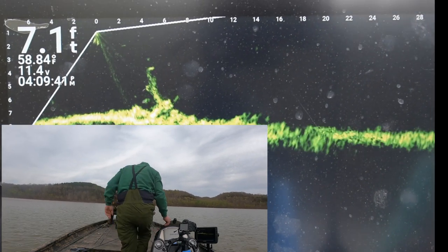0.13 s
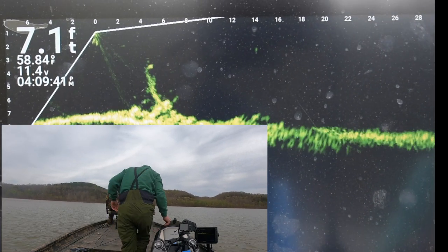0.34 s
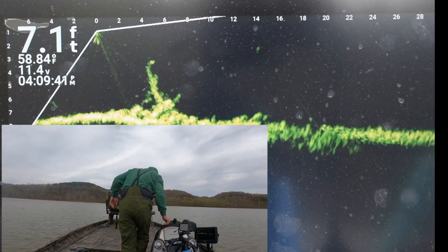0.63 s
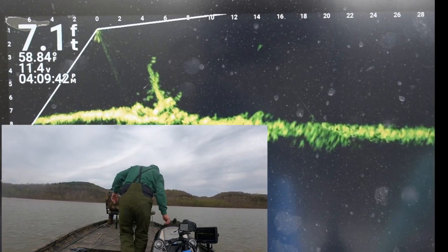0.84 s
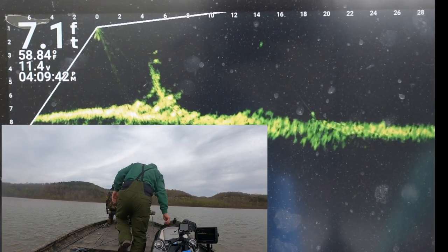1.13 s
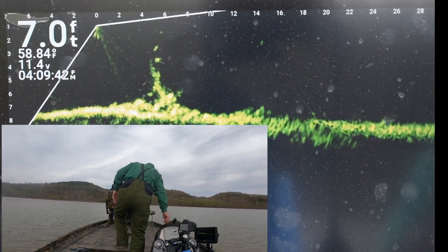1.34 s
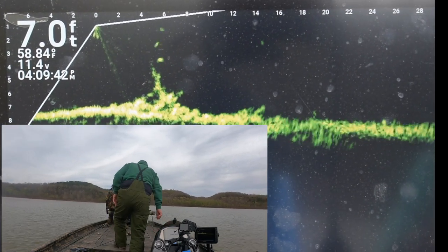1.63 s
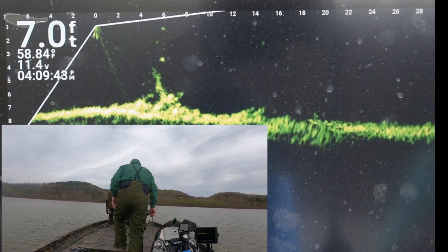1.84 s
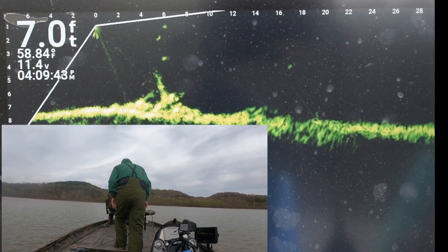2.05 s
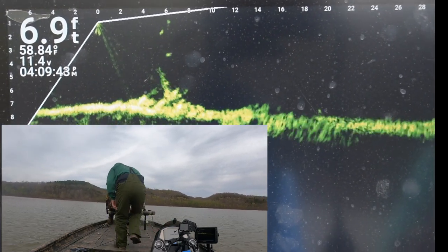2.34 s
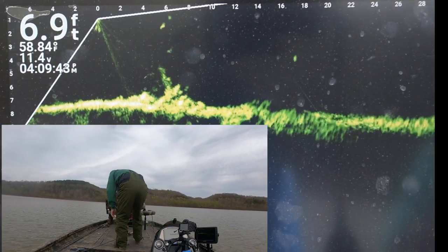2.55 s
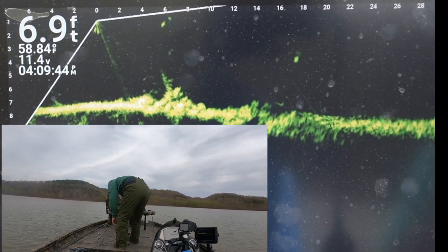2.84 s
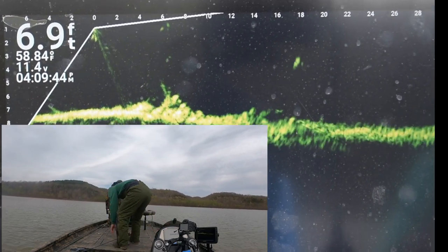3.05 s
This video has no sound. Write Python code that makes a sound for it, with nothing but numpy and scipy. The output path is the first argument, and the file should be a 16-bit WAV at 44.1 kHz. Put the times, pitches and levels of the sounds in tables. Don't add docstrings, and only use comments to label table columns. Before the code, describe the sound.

Heavy footsteps knock on a hollow boat deck as rain gear rustles and wind rumbles at the microphone.

```python
import sys
import numpy as np
from scipy import signal
from scipy.fft import rfft, irfft
from scipy.io import wavfile
from scipy.ndimage import uniform_filter1d

SR = 44100
rng = np.random.default_rng(int(sys.argv[2]) if len(sys.argv) > 2 else 0)


def wav_record(signal):
    frames = np.transpose(np.atleast_2d(signal))
    bounded = np.clip(frames, -1, 1)
    quanta = np.round(bounded * 32767).astype(np.int16)
    wavfile.write(sys.argv[1], SR, quanta)


def invert_db(level):
    return 10 ** (np.asarray(level, dtype=float) / 20)


N = 141120
BURST = SR // 2

# [f/Hz, level/dB]
AIR_SPECTRUM = [(150, -0.5), (300, -8.5), (800, -24), (1300, -28.5), (2200, -33), (6200, -30), (12000, -53),
                (15500, -76)]
# [t/s, level/dB, level above 80 Hz/dB]
GUSTS = [(.05, -38, -11.5), (.32, -30.5, 5.5), (.55, -27.5, -9.5), (.66, -40.5, -0.5), (.76, -35.5, -7),
         (1.0, -33, -7), (1.2, -46.5, 3), (1.4, -37.5, -8), (1.65, -53, 11.5), (1.9, -37.5, 1),
         (2.12, -45.5, 6.5), (2.3, -30.5, -1), (2.46, -42, -0.5), (2.52, -24, -9.5), (2.74, -34.5, 10.5),
         (2.83, -47, 7.5), (2.95, -34, 0.5), (3.2, -40, -0.5)]
# [f/Hz, level/dB]
WIND_SPECTRUM = [(12, -3.5), (30, 7), (60, 0), (110, -7.5), (200, -20.5), (400, -45.5), (800, -49.5)]
THUMP_TIMES = [.326, .332, .422, .459, .466, .752, 1.085, 1.762, 1.95, 2.025, 2.03, 2.571, 2.681, 2.841,
               2.845, 2.842, .934, 2.505, 1.767, .713]
# [f/Hz, peak level/dB, t60/s, left over right/dB]
THUMP_MODES = [(58.8, -29, 0.76, 0), (113.3, -29.5, 0.19, -12), (144, -17.5, 0.089, -1),
               (38.1, -17.5, 0.37, -6.5), (90, -17, 0.075, -13), (136, -32, 0.086, -2),
               (251, -41.5, 0.14, -1), (176, -17, 0.043, -0.5), (86, -37, 0.29, 2), (355, -41, 0.026, -3),
               (58.4, -33, 0.16, -5), (45.6, -19, 0.25, -12), (65.4, -19.5, 0.26, -11.5),
               (58.9, -16.5, 0.4, 0), (128, -13.5, 0.08, -1), (322, -25, 0.024, 0), (233.4, -27, 0.079, 1),
               (45, -32, 0.13, -6), (202, -29, 0.13, 1), (460, -29.5, 0.047, 1.5)]
# [t/s, peak level/dB, f/Hz, rub length/s]
TACKLE_RUBS = [(0.278, -43.5, 2840, 0.026), (0.676, -35.5, 456, 0.061), (.711, -36.5, 415, 0.0097),
               (0.713, -36.5, 990, 0.0045), (0.772, -38, 1820, 0.016), (.79, -41, 473, 0.055),
               (0.858, -38, 620, 0.031), (0.914, -30.5, 4120, 0.011), (0.908, -36.5, 1770, 0.013),
               (1.05, -40.5, 1700, 0.024), (1.075, -34.5, 724, 0.0095), (1.163, -49, 1300, 0.047),
               (1.216, -39.5, 1570, 0.019), (1.245, -44, 1440, 0.011), (1.339, -36.5, 1223, 0.029),
               (1.384, -43.5, 1190, 0.014), (1.739, -35, 690, 0.015), (1.798, -41.5, 1910, 0.015),
               (2.08, -42, 1240, 0.0055), (2.158, -37.5, 1090, 0.039), (2.248, -36.5, 664, 0.0076),
               (2.27, -39, 1300, 0.013), (2.46, -38, 414, 0.048), (2.647, -44, 1800, 0.018),
               (2.68, -46, 616, 0.008), (2.695, -34.5, 4380, 0.011), (2.952, -48.5, 6100, 0.014),
               (3.003, -49, 1550, 0.0059), (3.095, -45.5, 638, .01), (3.113, -41, 2180, 0.023)]
# [t/s, peak level/dB]
TACKLE_TICKS = [(0.229, -52), (.755, -44.5), (.787, -41), (0.96, -42), (1.054, -37.5), (1.076, -47.5),
                (1.244, -55), (1.385, -48.5), (2.247, -38), (2.849, -22.5), (3.098, -45)]
# [t/s, peak level/dB, f/Hz, rub length/s]
MORE_TACKLE_RUBS = [(.414, -58, 1000, .008), (.436, -34, 1300, .012), (.482, -36, 3900, .008),
                    (.488, -37, 1100, .012), (.652, -55, 3000, .02), (.74, -40.5, 500, .02),
                    (.76, -46, 3000, .008), (.805, -43.5, 800, .025), (.858, -42, 1020, .01),
                    (.865, -47, 2300, .035), (.89, -48, 3600, .006), (.93, -41, 800, .006),
                    (.962, -43, 500, .012), (.98, -48, 3800, .01), (1.188, -44, 1400, .01),
                    (1.2, -45.5, 900, .015), (1.216, -47.5, 2900, .012), (1.298, -56, 1300, .004),
                    (1.315, -50, 2200, .012), (1.34, -52, 2600, .015), (1.772, -51, 1200, .03),
                    (1.8, -58, 5100, .015), (1.815, -55, 3300, .012), (1.942, -34.5, 4000, .01),
                    (2.225, -42, 1480, .015), (2.33, -47, 600, .04), (2.47, -40, 280, .03),
                    (2.697, -43.5, 1450, .015), (2.748, -63, 1770, .015), (2.75, -55, 5400, .015),
                    (2.797, -59, 6500, .01), (2.86, -32, 420, .03), (3.1, -45.5, 350, .02)]
# [t/s, peak level/dB, t60/s]
MORE_TACKLE_TICKS = [(1.759, -40, 0.072), (1.939, -30, 0.016), (.418, -35.5, 0.034), (0.71, -38, .03),
                     (2.842, -40, 0.037), (2.248, -44, 0.026)]
# [f/Hz, level/dB]
TICK_SPECTRUM = [(1200, -5), (2500, 2.5), (4500, 2), (7500, -2.5), (10000, -19.5), (15000, -35)]
# [t/s, fabric level/dB, carpet level/dB]
CLOTH_MOVES = [(0, -50.5, -62.5), (.12, -46.5, -57), (.2, -54, -59.5), (0.231, -54, -77), (.25, -73, -60.5),
               (.56, -71.5, -74), (.63, -67.5, -74), (.68, -62.5, -55.5), (.8, -56, -55), (.92, -48, -46),
               (1.0, -55, -60.5), (1.09, -57, -53.5), (1.12, -67.5, -56.5), (1.3, -64, -57),
               (1.5, -66, -63.5), (1.68, -91, -73.5), (1.78, -69.5, -61), (1.85, -67, -62),
               (2.1, -64.5, -62), (2.2, -59, -53.5), (2.24, -51, -46.5), (2.32, -51.5, -48.5),
               (2.4, -61, -54.5), (2.46, -50.5, -54), (2.57, -52, -55.5), (2.61, -68, -58),
               (2.716, -58, -56.5),
               (2.78, -88, -66),
    (3.04, -71, -63.5),
    (3.2, -63.5, -58.5),
]
# [f/Hz, level/dB]
FABRIC_SPECTRUM = [(1200, -12), (2200, -0.5), (4000, 1), (5500, -0.5), (7500, -4.5), (10000, -14),
                   (12400, -15), (15500, -33)]
# [f/Hz, level/dB]
CARPET_SPECTRUM = [(250, 0), (420, -6), (700, -7), (1400, -8.5), (3000, -20.5)]
FOLD_BANDS = [2600, 5220, 3800, 7500]
# [t/s, panel level/dB, knock level/dB, crack level/dB, rise/s]
BLOWS = [
    (.411, -25, -28, -32, 0.009),
    (.479, -25.5, -29.5, -30.5, 0.0018),
    (0.927, -29, -25.5, -30.5, 0.0029),
    (1.757, -23, -23, -42.5, 0.0063),
    (1.937, -23, -26.5, -26.5, 0.0013),
    (2.841, -18.5, -23, -31.5, 0.0039),
]
CRACK_T60 = [0.18, 0.089, 0.13, 0.12, 0.052, 0.25]
# [f/Hz, level/dB]
PANEL_MODES = [(155, -2), (210, 1), (240, -1.5), (290, -6), (380, -15)]
# [f/Hz, level/dB]
KNOCK_MODES = [(480, 6), (590, 3), (678, 5), (900, -0.5), (1100, 0.5), (1300, -1.5), (1630, -4),
               (2000, -16.5)]
# [f/Hz, level/dB]
CRACK_SPECTRUM = [(1400, 5.5), (2500, 5), (3100, 1.5), (3800, 3.5), (6000, -10.5), (8000, -12),
                  (11000, -27.5), (15000, -40)]
# [f/Hz, side below mid/dB]
DIFFUSE_SIDE = [(300, -23), (2000, -12), (3500, -34), (8500, -29), (11000, -9), (15000, -1.5)]
# [f/Hz, side below mid/dB]
IMPACT_SIDE = [(200, -19.5), (1300, -16), (2400, -10), (6000, -16), (15000, -1)]


def level(x, db):
    return x * invert_db(db) / np.sqrt(np.mean(x ** 2))


def shape(x, points):
    p = np.array(points, float)
    f = np.fft.rfftfreq(len(x), 1 / SR) + 1
    db = np.interp(np.log(f), np.log(p[:, 0]), p[:, 1])
    db -= 18 * np.maximum(np.log2(p[0, 0] / f), 0)
    db -= 24 * np.maximum(np.log2(f / p[-1, 0]), 0)
    return irfft(rfft(x) * invert_db(db), len(x))


def colour(x, points):
    return level(shape(x, points), 0)


def lowpass(x, hz):
    return signal.sosfiltfilt(signal.butter(2, hz, fs=SR, output="sos"), x)


def walk(rate):
    k = int(SR / rate)
    held = np.repeat(rng.standard_normal(N // k + 1), k)
    return 0.98 * uniform_filter1d(uniform_filter1d(held, k), k)[:N]


def fade(t60):
    return 1000. ** (-np.arange(BURST) / SR / max(t60, .002))


def ring(x, hz, t60):
    pole = np.exp(2j * np.pi * hz / SR - np.log(1000) / (max(t60, .002) * SR))
    return signal.lfilter([1], [1, -pole], x).imag


def add(out, t, x, db):
    i = int(t * SR)
    x = x[:N - i]
    out[i:i + len(x)] += x * invert_db(db) / np.abs(x).max()


def scattered(x, lag):
    smear = rng.standard_normal(SR // 8) * np.exp(-np.arange(SR // 8) / SR / lag)
    return signal.fftconvolve(x, smear / np.linalg.norm(smear))[:N]


def open_water(t):
    air = colour(rng.standard_normal(N), AIR_SPECTRUM) * invert_db(-60 + 1.8 * walk(7.05))
    duck = sum((t > blow[0]) * np.exp(-np.abs(t - blow[0]) / 0.078) for blow in BLOWS)
    return air * invert_db(-1 * duck)


def motor():
    hz = 136.8 * (1 + 0.012 * walk(2.7))
    tone = np.sin(2 * np.pi * np.cumsum(hz) / SR)
    return level(tone, -59) * invert_db(2 * walk(4.6))


def port_turbulence(t):
    gust_t, gust_db, eddy_db = np.array(GUSTS).T
    x = colour(rng.standard_normal(N), WIND_SPECTRUM)
    low = lowpass(x, 80)
    eddies = (x - low) * invert_db(np.interp(t, gust_t, eddy_db) + 6 * walk(18))
    return (low + eddies) * invert_db(np.interp(t, gust_t, gust_db) + walk(9.98))


def wind(t):
    both = port_turbulence(t)
    left = both + invert_db(-6.5) * port_turbulence(t)
    right = both + invert_db(-4.5) * port_turbulence(t)
    return np.array([left, right]) * invert_db(-0.5)


def thumps():
    out = np.zeros((2, N))
    for t, (hz, db, t60, pan_db) in zip(THUMP_TIMES, THUMP_MODES):
        half_period = int(SR / hz / 2)
        push = np.zeros(BURST)
        push[:half_period] = np.hanning(half_period)
        thump = ring(push, hz, t60)
        add(out[0], t, thump, db + pan_db / 2)
        add(out[1], t, thump, db - pan_db / 2)
    return out


def rub(length):
    t = np.arange(BURST) / SR
    onset = 1 - np.exp(-t / (0.093 * length + 0.00045))
    return rng.standard_normal(BURST) * onset * np.exp(-(t / max(length, .001)) ** 2)


def tackle(rubs, ticks):
    out = np.zeros(N)
    for t, db, hz, length in rubs:
        push = rub(length)
        narrow_t60 = 1.63 * 5.3 / min(hz, np.sqrt(hz * 1500))
        narrow = ring(ring(push, hz, narrow_t60), hz, narrow_t60)
        wide = ring(ring(push, hz * 0.84, 4 / hz), hz * 0.84, 4 / hz)
        add(out, t, level(narrow, 0) + level(wide, -6.5), db)
    rise = np.minimum(np.arange(BURST) / SR / 0.0013, 1)
    for t, db, t60 in ticks:
        add(out, t, colour(rng.standard_normal(BURST), TICK_SPECTRUM) * fade(t60) * rise, db)
    return out


def grit():
    strength = invert_db(np.minimum(4 * rng.exponential(size=N), 12))
    grains = (rng.random(N) < 600 / SR) * strength * rng.standard_normal(N)
    return rng.standard_normal(N) + level(grains, -9)


def swish(t):
    move_t, fabric_db, carpet_db = np.array(CLOTH_MOVES).T
    fabric = colour(grit(), FABRIC_SPECTRUM) * invert_db(np.interp(t, move_t, fabric_db) + 1.2 * walk(40.05))
    carpet = colour(grit(), CARPET_SPECTRUM) * invert_db(np.interp(t, move_t, carpet_db) + 2.57 * walk(44.8))
    return fabric + carpet


def folds(cloth):
    change = np.zeros(N)
    for hz in FOLD_BANDS:
        bandpass = signal.butter(1, [hz / 1.156, hz * 1.085], "band", fs=SR, output="sos")
        change += signal.sosfiltfilt(bandpass, cloth) * (invert_db(4.5 * walk(22) - 1.0) - 1)
    return change


def rattle(rise, t60):
    t = np.arange(BURST) / SR
    lumps = np.interp(t, np.arange(126) / 250, rng.standard_normal(126))
    return rng.standard_normal(BURST) * np.minimum(t / rise, 1) ** 2 * fade(t60) * invert_db(2.5 * lumps)


def struck_panel(modes, rise, t60, shake_t60, shake_db):
    detune = 1 + 0.029 * rng.standard_normal(len(modes))
    out = np.zeros(BURST)
    for (hz, db), factor in zip(modes, detune):
        force = rattle(rise, .035) + invert_db(shake_db) * rattle(rise, shake_t60)
        out += invert_db(db) * ring(force, hz * factor, t60)
    return out


def crack_of_blow(rise, length):
    crack = colour(rattle(rise, length) + invert_db(-14) * rattle(rise, 0.12), CRACK_SPECTRUM)
    dull = lowpass(crack, 4500)
    return dull + (crack - dull) * fade(2.1 * length) * invert_db(2.5)


def steps():
    out = np.zeros(N)
    for (t, panel_db, knock_db, crack_db, rise), length in zip(BLOWS, CRACK_T60):
        add(out, t, struck_panel(PANEL_MODES, rise, t60=.1, shake_t60=0.25, shake_db=-17), panel_db)
        add(out, t, struck_panel(KNOCK_MODES, rise, t60=.03, shake_t60=0.16, shake_db=-3), knock_db)
        add(out, t, crack_of_blow(rise, length), crack_db)
    return out


def scene():
    t = np.arange(N) / SR
    air = open_water(t)
    hum = motor()
    low = wind(t) + thumps()
    more_tackle = tackle(MORE_TACKLE_RUBS, MORE_TACKLE_TICKS)
    small = tackle(TACKLE_RUBS, [(*tick, 0.082) for tick in TACKLE_TICKS])
    cloth = swish(t)
    hits = steps() + small

    mid = hits + cloth + hum + air + more_tackle + folds(cloth)
    side = shape(scattered(hits, 0.007), IMPACT_SIDE)
    side += shape(scattered(more_tackle, 0.007), IMPACT_SIDE)
    side += shape(scattered(cloth, 0.015), DIFFUSE_SIDE)
    side += shape(scattered(air, 0.013), DIFFUSE_SIDE) * invert_db(14.5)
    balance = invert_db(np.array([[.5], [-.5]]) * -0.7)
    return np.array([mid + side, mid - side]) * balance + low


def roll_off(x):
    return signal.sosfilt(signal.butter(12, 15620, fs=SR, output="sos"), x)


def record(dry):
    top_cut = signal.ellip(8, .2, 60, 15500, fs=SR, output="sos")
    mix = signal.sosfilt(top_cut, dry)
    return roll_off(mix)


dry = scene()
out = record(dry)
wav_record(out)
```